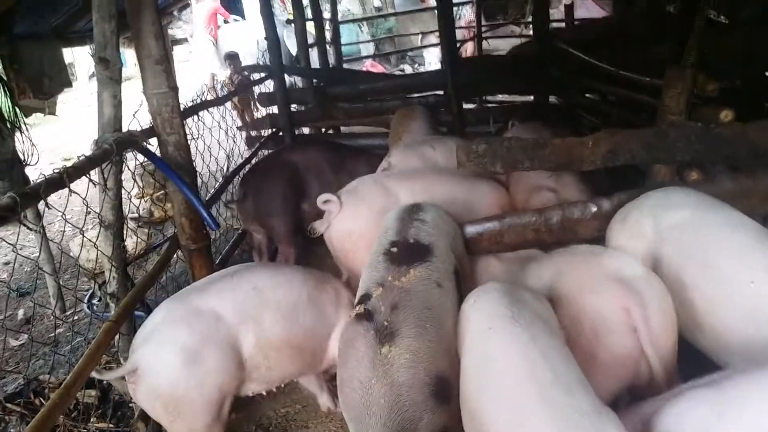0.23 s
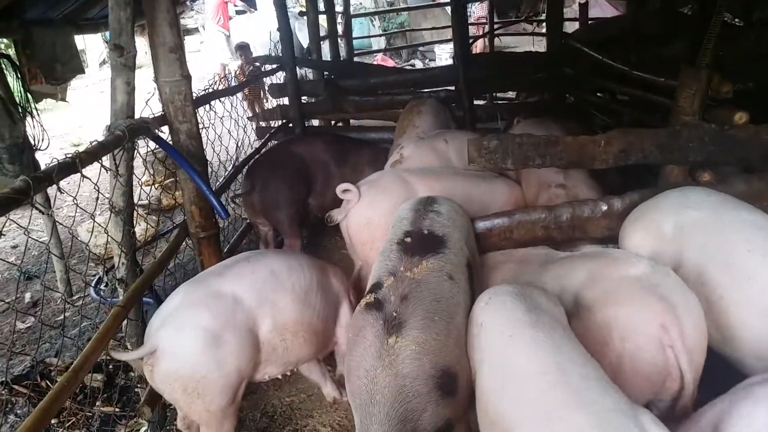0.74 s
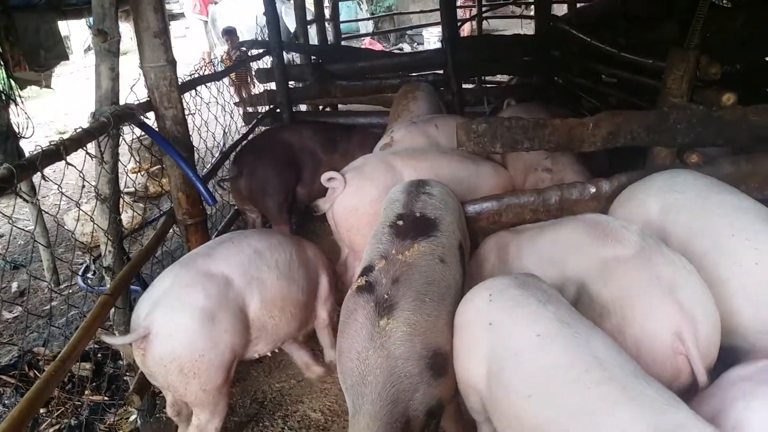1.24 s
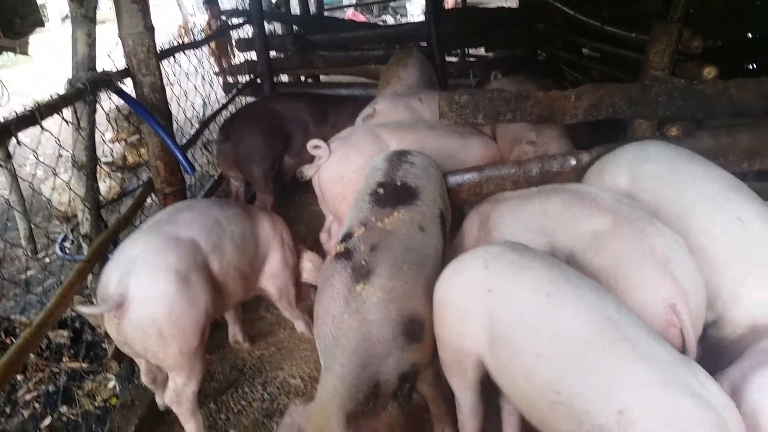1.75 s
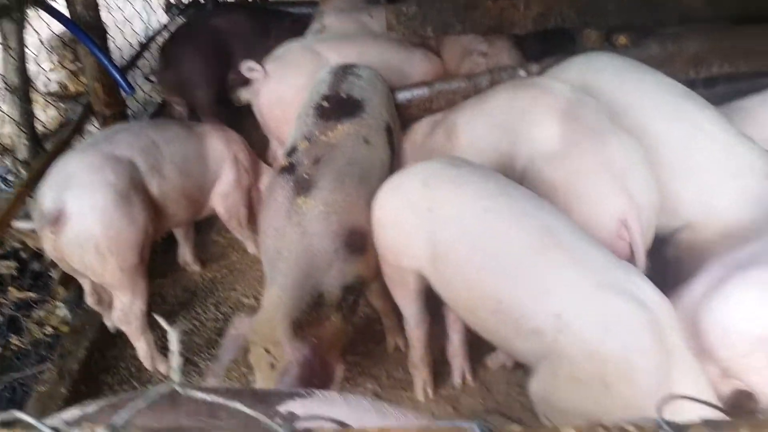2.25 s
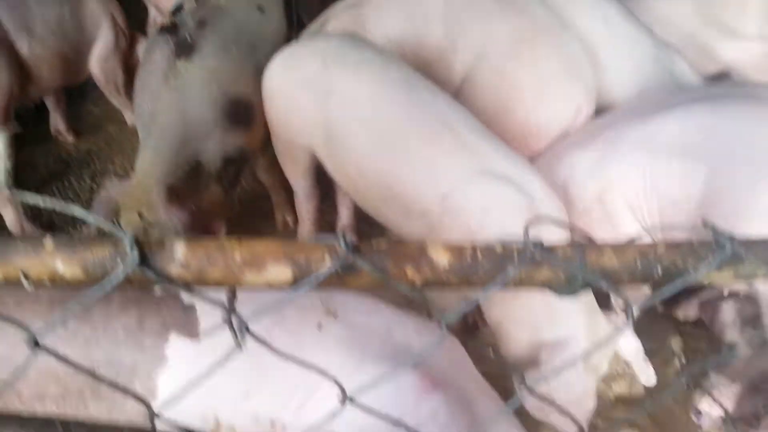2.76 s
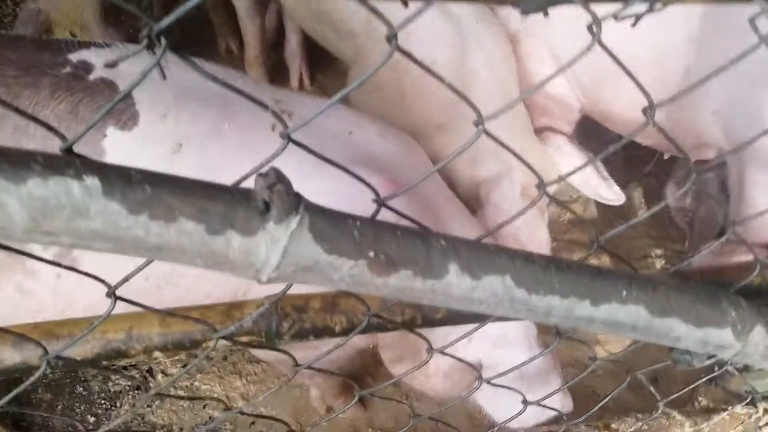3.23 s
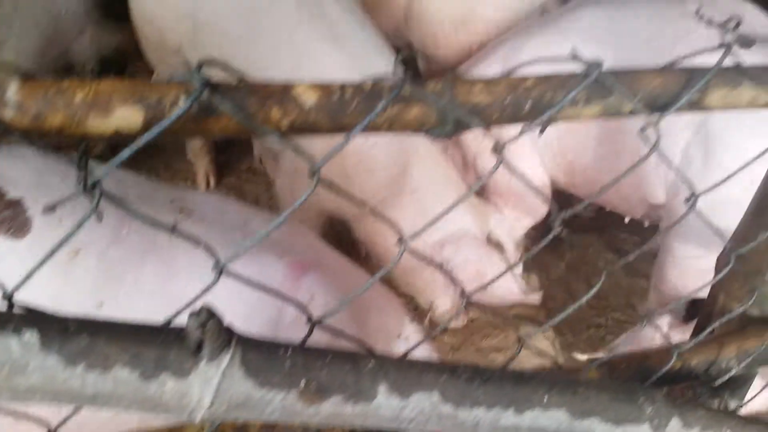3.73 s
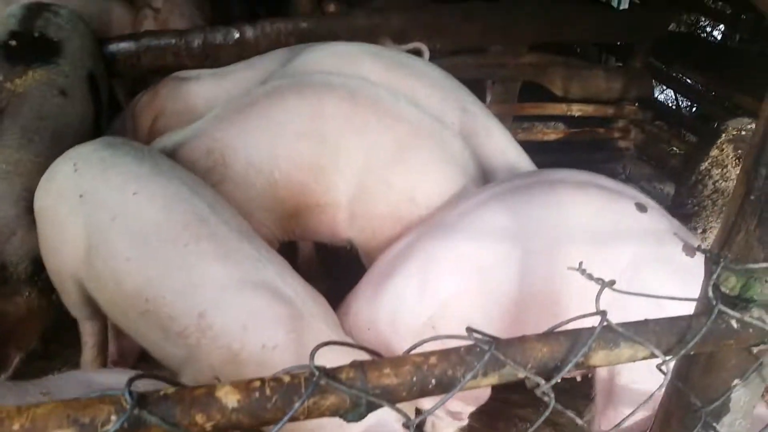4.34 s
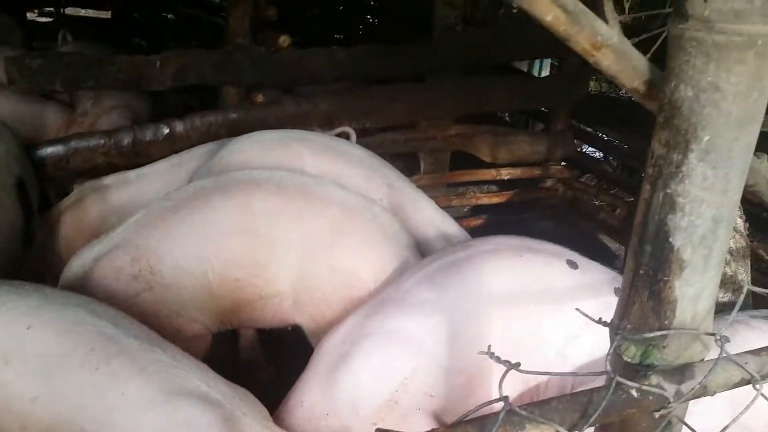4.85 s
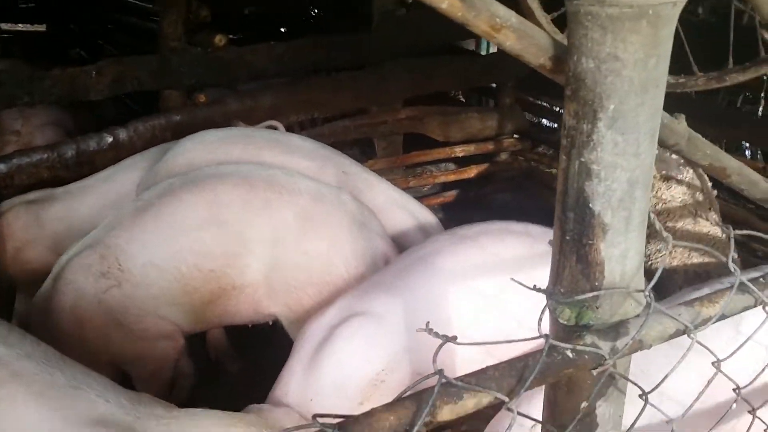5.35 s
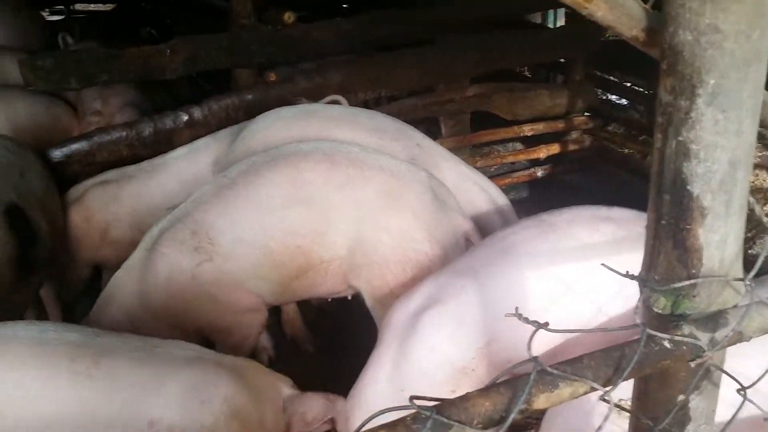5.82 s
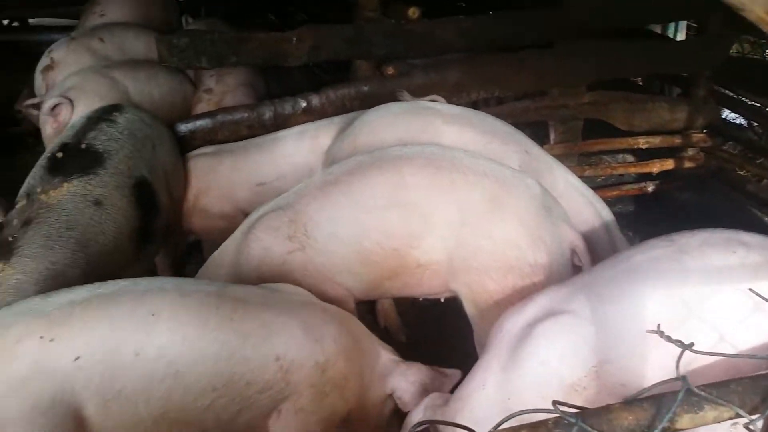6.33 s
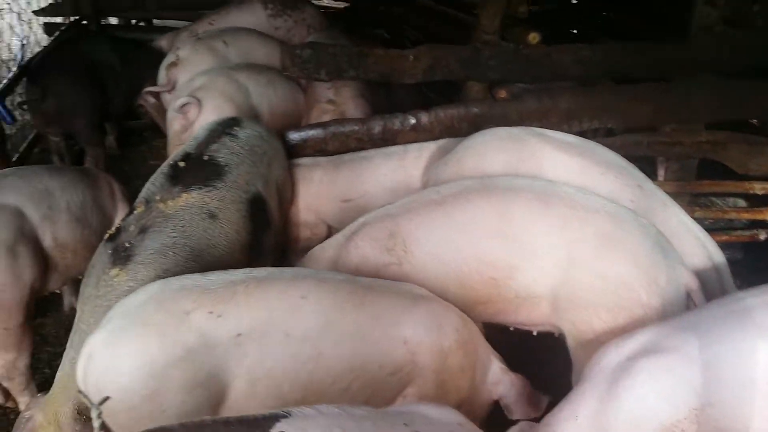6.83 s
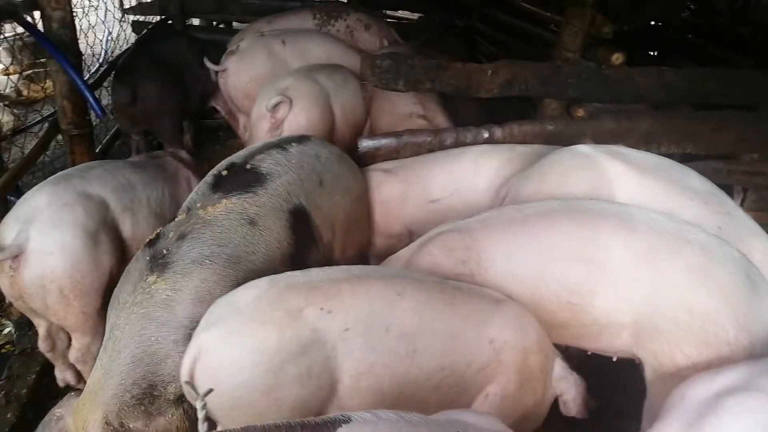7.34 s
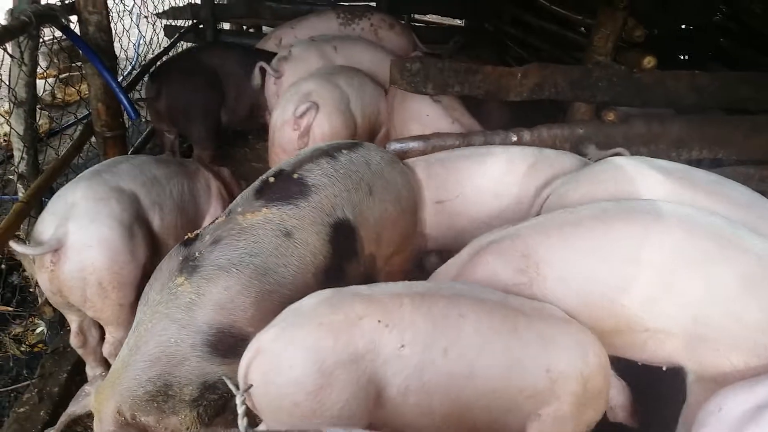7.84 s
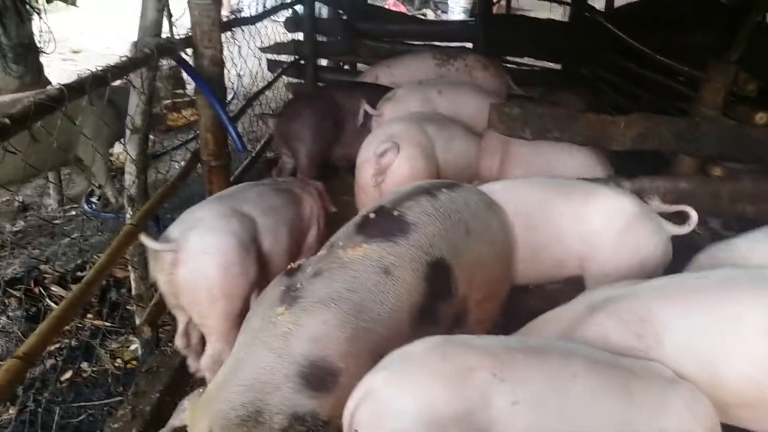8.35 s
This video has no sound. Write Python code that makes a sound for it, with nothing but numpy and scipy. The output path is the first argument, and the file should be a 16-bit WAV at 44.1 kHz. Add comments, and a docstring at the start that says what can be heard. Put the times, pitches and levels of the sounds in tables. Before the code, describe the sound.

A herd of pigs feeds close by in an open wooden pen with a slight, short echo. Low muttering, snuffling and wet smacking, chomping and slurping continue throughout. A blunt oink comes at about 0.5 seconds, short rattling grunts around 1.3 to 1.5 seconds, and another at 2.2. A low rumble and brief growls follow from 2.6 to 3 seconds, then a faint whimper. At 3.4 seconds one pig starts growling and works up into a loud, hoarse scream, which turns shrill with a braying edge and lasts until about 5.4. Sharp growls near 6 seconds lead into a second, shorter scream from 6.2 to 6.9. From about 7.3 seconds, throaty growls and closed-mouth rumbles take over, dying away by 8.3 and leaving the snuffling and wet smacks of feeding.

```python
"""Pigs jostle at a trough in an open wooden pen; throughout, the herd mutters, snuffles and smacks wet feed.
First come an oink and short rattling grunts: slack tissue chops the breath and the vocal tract resonates.
Low rumbles, growls and a faint whimper follow. At 3.4 s one pig works itself up from a growl into a long
hoarse scream, on which taut vocal folds add a shrill squeal and a bray at a seventh of its pitch.
A second, shorter scream rises at 6.2 s; growls and closed-mouth rumbles end the scene."""
import sys
import numpy as np
from scipy import signal
from scipy.fft import rfft, irfft, next_fast_len
from scipy.io import wavfile
from scipy.ndimage import uniform_filter1d, map_coordinates

SR = 44100
rng = np.random.default_rng(int(sys.argv[2]) if len(sys.argv) > 2 else 0)


def wav_out(sig):
    """Save sig, one row per channel (or a flat mono array), as 16-bit PCM at SR to the path in sys.argv[1]."""
    wavfile.write(sys.argv[1], SR, np.round(np.clip(np.atleast_2d(sig).T, -1, 1) * 32767).astype(np.int16))


N = 378378
TIME = np.arange(N) / SR

# spectrum of the pen's echo: (frequency [Hz], gain [dB])
ECHO_SPECTRUM = [(200, -15), (700, 1.5), (1500, 1.5), (4000, 5.5), (10000, 2.5)]
# stereo balance of each source: (frequency [Hz], left minus right [dB])
HERD_BALANCE = [(60, -3), (150, -2.5), (380, -2.5), (950, 1), (2380, 3.5), (5980, 11.5), (15000, 13.5)]
GRUNT_BALANCE = [(250, -3.5), (1200, 3.5), (3000, 0), (8000, 13)]
GROWL_BALANCE = [(60, 5), (240, -4), (950, 3.5), (3770, 5), (15000, 34)]
SCREAM_BALANCE = [(60, -2.5), (130, -2.0), (290, -2.5), (640, -1.5), (1410, 4), (3100, 4), (5000, 4),
                  (7300, 24.5), (10000, 15), (14000, 9)]
# likeness of the herd's sound left and right: (frequency [Hz], correlation [-1 to 1])
HERD_CORRELATION = [(60, 0.84), (150, 0.96), (380, 0.9), (950, 0.4), (2380, -0.0057), (5980, 0.23),
                    (15000, -0.3)]
# spectra of the noise sources: (frequency [Hz], relative level [dB])
MUTTER_SPECTRUM = [(13, -61), (22, -33), (75, -7), (155, -3), (190, 0.5), (210, -5), (243, -1.5),
                   (302, -11), (339, -4.5), (381, -19.5), (516, -10), (588, -13.5), (700, -12.5),
                   (910, -29), (1540, -120)]
SNUFFLE_SPECTRUM = [(350, -16), (600, -10), (697, -7.5), (756, 0.5), (832, 0.5), (902, -1), (1170, 0),
                    (1410, -2), (1880, -1.5), (2440, -3), (3770, -14), (6060, -16), (7240, -6.5),
                    (10000, -24.5), (15500, -28.5)]
CHOMP_SPECTRUM = [(400, -22), (800, 4), (1200, 7.5), (1700, 6), (2400, 10), (3500, -13), (7300, -8),
                  (11000, -34)]
SLURP_SPECTRUM = [(1500, -25), (3000, -12), (4200, 2), (5500, -1), (7200, 2), (9000, -14), (14000, -19)]
BITE_SPECTRUM = [(300, -22), (700, 2), (900, -9), (1400, -12), (2000, 6), (2750, 3), (3600, -6),
                 (7000, -21), (12000, -35)]
HISS_SPECTRUM = [(2600, -43), (3300, -14), (3700, -8), (4250, -5.5), (4800, -6), (5400, -4.5), (6300, -5.5),
                 (6900, -5), (7450, 2.5), (8100, -6.5), (9000, -12), (10000, -20), (11500, -30),
                 (12800, -24), (14200, -24.5), (15200, -42)]
# slow course of the herd's muttering: (time [s], level [dB])
MUTTER_LEVELS = [(0, -36.5), (1.1, -37.5), (2.6, -37), (4, -36.5), (5.7, -36.5), (6.6, -36.5), (7.2, -37.5),
                 (8.5, -37)]
# wet smacks of snouts and chomps of jaws: (time [s], level before filtering [dB])
SMACKS = [(0.0563, -17.5), (0.238, -30), (0.3, -26), (0.427, -31), (0.506, -25), (0.676, -22.5),
          (1.054, -27), (1.317, -22), (1.4845, -25), (1.6, -25), (1.7574, -26), (1.791, -27),
          (1.9494, -23.5), (2.247, -22), (2.28, -26), (2.4029, -25), (3.42, -23), (3.808, -17.5),
          (5.6035, -17.5), (5.7594, -29), (6.098, -16.5), (6.996, -24), (7.118, -27), (7.429, -25),
          (7.819, -22.5), (8.245, -22.5), (8.303, -24), (8.3509, -20.5), (8.389, -26), (8.411, -22)]
CHOMPS = [(.097, -28), (.335, -26.5), (.75, -30), (1.21, -31), (1.665, -30), (1.88, -31), (2.11, -26.5),
          (2.345, -27.5), (2.53, -26), (3.225, -31), (5.605, -36), (5.661, -37), (5.76, -24)]
# snouts sucking at slop, and closed-mouth rumbles: (time [s], duration [s], level [dB])
SLURPS = [(0.063, .035, -43), (0.828, .03, -50), (1.06, .025, -47), (1.33, .04, -46), (1.578, .05, -45),
          (1.657, .04, -49), (2.26, 0.063, -43.5), (2.517, .015, -45), (8.333, .07, -48)]
RUMBLES = [(2.6, 0.37, -46), (4.3, .12, -45), (7.55, 0.31, -39.5), (8.0, 0.33, -42.5)]
# resonances of the airways: (frequency [Hz], half-width [Hz], relative gain [dB])
RUMBLE_CHEST = [(86.3, 16, 1), (114.5, 36, -2)]
OINK_SNOUT = [(510, 76, 1.5), (730, 80, -3.5), (1150, 110, 3), (1420, 83, 3), (1680, 64, -4),
              (2850, 180, -11)]
GRUNT_MOUTH = [(550, 120, 7.5), (1160, 135, 14.5), (1800, 200, -5), (2420, 880, -5), (6960, 420, -4)]
GROWL_CHEST = [(205, 27, -1.6), (250.5, 22, -0.6), (291, 31, -1.3)]
GROWL_MOUTH = [(691, 47, 5.5), (1064, 116, -7), (1287, 120, -1), (1437, 63, -5), (2180, 200, -9),
               (2740, 180, -8), (3450, 230, -18), (6930, 870, -24.5)]
WINDUP_MOUTH = [(669, 39, 3.5), (1322, 133, 1.5), (1455, 42, 7), (2190, 48, -0.5), (2460, 120, -5.5),
                (2890, 96, -8), (3330, 290, -17.5), (7000, 930, -23)]
SCREAM_THROAT = [(679.3, 26, -0.5), (763, 44, -8)]
SCREAM_MOUTH = [(1228, 91, 0), (1372, 23, 3), (1491, 73, 2), (2145, 56, -1.5), (2470, 133, 1.5),
                (2745, 57, 3.5), (3110, 130, -11), (3470, 610, -8.5)]
SCREAM_NOSE = [(1560, 37, -2), (2123, 32, -3), (2558, 83, 6), (2870, 62, -1), (3200, 100, -1.5),
               (6140, 290, -10.5)]
# hard snaps of the throat within the calls: (time [s], relative ring level [dB], relative bite level [dB])
SNAPS = [(0.481, -19.5, -28), (1.284, -17, -34), (1.31, -13, -29), (1.347, -21, -22), (1.365, -16, -34),
         (1.41, -18, -38), (1.44, -18.5, -36), (2.942, -19, -21), (5.956, -19, -19), (6.023, -25, -23),
         (6.046, -15, -14), (6.07, -18, -22), (6.096, -19, -15), (7.455, -16, -14), (7.697, -24, -22),
         (7.748, -33, -20)]
# modes that a snap excites: (frequency [Hz], gain [dB], time to decay by 60 dB [s])
SNAP_MODES = [(276, -8, 0.047), (1090, -4, 0.048), (1217, -6, 0.047), (1390, -12, .03)]
# a blunt oink, open-mouthed growls, and growls that lead into the screams:
# (time [s], duration [s], mouth delay [s], pitch [Hz], relative chest level [dB],
#  relative mouth level [dB])
OINKS = [(0.463, 0.044, 0.003, 284.4, -35, -27.5)]
GROWLS = [(2.857, 0.054, 0, 293.7, -31.5, -35), (2.932, 0.025, 0.0077, 299.6, -26.5, -28),
          (2.969, 0.036, 0.0018, 298, -28.5, -25), (7.322, .015, .015, 250, -32, -50),
          (7.348, 0.085, 0.035, 264, -26, -31.5), (7.45, 0.072, 0.005, 287.7, -29, -33.5),
          (7.545, 0.17, 0.002, 299, -29, -26), (7.735, .13, .002, 269.8, -30.5, -30.5)]
WINDUPS = [(3.406, 0.054, 0.0067, 290, -28.5, -37.5), (3.452, 0.055, 0.009, 288, -26.5, -34),
           (3.505, 0.045, 0.0072, 302.4, -23, -26.5), (3.577, 0.16, 0.00038, 299, -26.5, -30.5),
           (5.872, 0.04, 0.025, 262, -27.5, -33), (5.951, 0.04, 0.002, 267.6, -24.5, -30.5),
           (6.015, 0.085, 0.0008, 278, -26.5, -21), (6.125, 0.095, 0.0002, 273, -27, -24)]
# short grunts, and a throaty swell near 1.2 kHz within the last growl:
# (the six columns above, scale of the mouth's resonances [ratio])
GRUNTS_AND_SWELL = [(1.28, 0.008, 0.0064, 301, -36, -31, 0.92),
                    (1.308, 0.041, 0.0017, 300.7, -31, -24.5, 1.01), (1.385, .03, 0, 298.8, -31, -36, .98),
                    (1.445, .04, 0, 298.2, -25.5, -32.5, .98),
                    (1.519, 0.03, 0.00099, 294, -31.5, -35.5, 0.97), (2.215, 0.094, 0, 290, -27.5, -32, 1),
                    (7.458, 0.068, 0.002, 288, -50, -25.5, 1.05)]
# harmonic spectra of the voiced sounds: (harmonic [number], relative level [dB])
CHEST_HARMONICS = [(1, -1.5), (2, -21), (4, -19), (5, -25), (7, -30), (8, -31)]
FIRST_BRAY_HARMONICS = [(4, -12), (5, -7), (7, -10), (8, -6), (9, -2), (10, -6), (15, -13), (16, -13),
                        (21, -7.5)]
SECOND_BRAY_HARMONICS = [(4, -9), (5, -16), (8, -15), (9, -1), (13, -15), (15, -19), (21, -4), (23, -18)]
SQUEAL_HARMONICS = [(2, 2), (3, -11.5), (4, -24), (5, -19), (6, -13), (7, -29)]
# a chest tone, and a moan on the throat's resonance that rises with effort and sinks as the scream tires;
# one list per scream: (time [s], pitch [Hz], level [dB])
CHEST_NOTES = [
    [(3.7, 301.2, -32), (3.75, 305.4, -23), (3.94, 303.6, -21), (4.0, 314, -28), (4.07, 321, -28.5),
     (4.19, 330.6, -30), (4.43, 336.4, -29), (4.82, 337, -36.5), (5.0, 340, -46.5)],
    [(6.32, 313.4, -47), (6.6, 329.3, -41), (6.76, 336, -29.5), (6.89, 314, -41)],
]
MOAN_NOTES = [
    [(3.69, 690, -37), (3.93, 667, -42), (4.15, 664, -36), (4.19, 666.3, -29.5), (4.4, 682, -33.5),
     (4.8, 684.4, -34), (5.15, 698.3, -35), (5.26, 680, -39), (5.43, 640, -45)],
    [(6.2, 664, -37), (6.31, 665.3, -28), (6.46, 689, -41.5), (6.6, 699, -36), (6.76, 714, -30),
     (6.88, 653, -34)],
]
# vibration of the vocal folds in each scream: (time [s], pitch [Hz])
FIRST_SCREAM_PITCH = [(3.95, 1135), (4.04, 1215), (4.09, 1220), (4.12, 1085), (4.17, 1165), (4.24, 1209),
                      (4.32, 1228), (4.37, 1299), (4.45, 1335), (4.5, 1262), (4.6, 1193), (4.73, 1210),
                      (4.86, 1179), (4.95, 1190), (5.07, 1241), (5.17, 1198), (5.26, 1168), (5.37, 1095),
                      (5.43, 1108)]
SECOND_SCREAM_PITCH = [(6.27, 1165), (6.395, 1145), (6.44, 1211), (6.49, 1221), (6.55, 1172), (6.62, 1243),
                       (6.69, 1225), (6.76, 1175), (6.83, 1084), (6.9, 1048)]
# the squeal catches as a clear whistle: (time [s], duration [s], fundamental [dB], overtones [dB])
WHISTLES = [(4.035, .05, -33, -42), (4.11, 0.045, -35, -29.5), (4.2, .165, -23.5, -26.5),
            (4.382, 0.089, -18.5, -28), (4.491, 0.064, -33.5, -24.5), (4.74, 0.052, -35, -30),
            (5.237, 0.028, -46, -30), (5.395, 0.043, -35, -27), (6.389, 0.076, -23.5, -24),
            (6.59, 0.05, -20.5, -24), (6.81, 0.045, -35, -26.5)]
# a scream starts hoarse; a squeal and a bray join it, in either order; levels are relative:
# (start [s], squeal onset [s], bray onset [s], end [s], throat [dB], mouth [dB], hiss [dB],
#  early hiss [dB], nose [dB], squeal fundamental [dB], overtones [dB], bray [dB], roughness [ratio])
SCREAMS = [(3.674, 4.09, 4.46, 5.43, -27.5, -31.5, -29.5, -39.5, -33, -33.5, -25.5, -33, .55),
           (6.199, 6.371, 6.33, 6.875, -28.5, -26.5, -28, -32.5, -31.5, -28.5, -26, -33, .25)]

GRUNT_ATTACK_S, GRUNT_RELEASE_S, GRUNT_FADE_DB_PER_S = 0.017, 0.049, 23
SCREAM_ATTACK_S, SCREAM_RELEASE_S = 0.036, 0.043
BRAY_CYCLES = 7  # cycles of the squeal in one period of the bray


def amp(db):
    """Amplitude ratio of a level: a factor of ten per 20 dB."""
    return np.exp(np.asarray(db) * (np.log(10) / 20))


def unit(x):
    """Normalisation to an rms of 1."""
    return x / np.sqrt(np.mean(x ** 2) + 1e-20)


def along(points, hz):
    """Interpolation of (frequency [Hz], value) points on a logarithmic axis."""
    frequencies, values = np.transpose(points)
    return np.interp(np.log(hz + 1), np.log(frequencies + 1), values)


def curves(rows):
    """Linear interpolation in time: one value per sample for each column after the first."""
    times, *columns = np.transpose(rows)
    return [np.interp(TIME, times, column) for column in columns]


def ramp(start, length):
    """Linear transition from 0 to 1."""
    return np.clip((TIME - start) / length, 0, 1)


def envelope(start, end, attack, release, fade_db_per_s=0):
    """Amplitude envelope: linear attack and release on an exponential decay."""
    shape, on = np.zeros(N), slice(int(start * SR), int((end + release) * SR))
    age = TIME[on] - start
    rise = np.clip(age / attack, 0, 1)
    fall = np.clip(1 - (TIME[on] - end) / release, 0, 1)
    shape[on] = rise * fall * amp(-fade_db_per_s * age)
    return shape


def wobble(rate):
    """Random modulation: a smooth curve through rate Gaussian knots a second."""
    knots = rng.standard_normal(int(N * rate / SR) + 4)
    coarse = TIME[::8]
    return np.interp(TIME, coarse, map_coordinates(knots, [coarse * rate]))


def filtered(x, response):
    """Linear filtering: the spectrum is multiplied by a frequency response."""
    size = next_fast_len(N + SR // 4, True)
    gain = response(np.fft.rfftfreq(size, 1 / SR)).astype(np.float32)
    return irfft(rfft(x.astype(np.float32), size) * gain, size)[..., :N]


def coloured(x, spectrum):
    """Spectral shaping by (frequency [Hz], gain [dB]) points."""
    return filtered(x, lambda hz: amp(along(spectrum, hz)))


def steadied(x, span_s):
    """Compression: division by the running rms evens out the chance swells of a resonance."""
    return x / np.sqrt(np.abs(uniform_filter1d(x * x, int(span_s * SR))) + np.mean(x * x) / 10)


def panned(pair, balance, colour=np.ones_like):
    """Level difference between the ears: left and right share a signal by frequency."""
    def shares(hz):
        lean = amp(along(balance, hz))
        return 2 * colour(hz) * np.array([lean, np.ones_like(lean)]) / (1 + lean)
    return filtered(pair, shares)


def pen(x, balance, left_lead_s=.0001, t60=0.17, echo_db=0):
    """Diffuse reflection: boards and roof scatter a short echo that shifts as the pigs move."""
    size = SR // 4
    window = np.sin(np.pi * np.arange(size) / size)
    decay = amp(-60 * TIME[:SR // 10] / t60)
    echo = np.zeros((2, N + SR))
    for start in range(0, N, size // 2):
        piece = x[start:start + size]
        tail = rng.standard_normal((2, len(decay))) * decay / np.linalg.norm(decay)
        if np.abs(piece).max() > 1e-5:
            windowed = np.float32([piece * window[:len(piece)]])
            reflected = signal.fftconvolve(windowed, np.float32(tail), axes=1)
            echo[:, start + SR // 300:][:, :reflected.shape[1]] += reflected
    direct = np.array([x, np.interp(TIME - left_lead_s, TIME, x)])
    pair = direct + amp(echo_db) * coloured(echo[:, :N], ECHO_SPECTRUM)
    offset_echo_power = lambda hz: (1 + amp(echo_db + along(ECHO_SPECTRUM, hz)) ** 2 / 2) ** -.5
    return panned(pair, balance, offset_echo_power)


def bursts(rows, t60):
    """Impulsive excitation: exponentially decaying noise for each (time [s], level [dB]) row."""
    out, t = np.zeros(N + SR), TIME[:SR // 10]
    for start, db in rows:
        out[int(start * SR):][:len(t)] += amp(db - 60 * t / t60) * rng.standard_normal(len(t))
    return out[:N]


def flutter(rate, scatter, life, leak, spread_db):
    """Turbulence: each uneven flap of tissue frees a puff of air with a time constant of life cycles."""
    cycles = np.cumsum(rate * np.exp(scatter * wobble(rate))) / SR
    flap = cycles.astype(int)
    strength = amp(spread_db * rng.standard_normal(flap[-1] + 1))[flap]
    puffs = strength * np.exp(-(cycles % 1) / life)
    return unit((puffs + leak) * rng.standard_normal(N))


def tract(x, modes, stretch=1):
    """Formant filtering: resonances with steep skirts, all moved by one factor through time warping."""
    def response(hz):
        return sum(amp(db) * (2j * hz * width / (centre ** 2 - hz ** 2 + 2j * hz * width)) ** 2
                   for centre, width, db in modes)
    clock = np.cumsum(stretch * np.ones(N)) / SR
    warped = np.interp(TIME, clock, x)
    ring = irfft(response(np.fft.rfftfreq(SR // 8, 1 / SR)))
    return np.interp(clock, TIME, signal.oaconvolve(warped, ring)[:N])


def phase_of(pitch, jitter, rate):
    """Phase as the integral of a frequency that trembles at random."""
    return 2 * np.pi * np.cumsum(pitch * (1 + jitter * wobble(rate))) / SR


def partials(phase, harmonics):
    """Fourier series: sines on multiples of a phase, each of rms 1 at 0 dB."""
    angle = (phase % (2 * np.pi)).astype(np.float32)
    return np.sqrt(2) * sum(float(amp(db)) * np.sin(round(k) * angle) for k, db in harmonics)


def hum(pitch, harmonics, jitter, shimmer_db=3.0):
    """Phonation: the folds vibrate almost periodically, with jitter in pitch and shimmer in level."""
    return amp(shimmer_db * wobble(60)) * partials(phase_of(pitch, jitter, rate=140), harmonics)


def crowd(spectrum, patchy_db):
    """Incoherent summation: many snouts merge into partly correlated stereo noise in shifting patches."""
    noise = signal.stft(rng.standard_normal((2, N)), nperseg=512)[2]
    patches = uniform_filter1d(rng.standard_normal(noise.shape[1:]), size=5, axis=0)
    patches = uniform_filter1d(patches, size=14, axis=1)
    pair = signal.istft(noise * amp(patchy_db * unit(patches)), nperseg=512)[1][:, :N]

    def mid_and_side(hz):
        angle = np.arccos(np.clip(along(HERD_CORRELATION, hz), -1, 1)) / 2
        return amp(along(spectrum, hz)) * [np.cos(angle), np.sin(angle)]
    mid, side = filtered(pair, mid_and_side)
    return panned(np.array([mid + side, mid - side]) / np.std(mid), HERD_BALANCE)


def herd(snuffle_db=-39):
    """Amplitude-modulated noise: the herd's low muttering and brighter snuffling waver in level."""
    mutter_db, = curves(MUTTER_LEVELS)
    mutter = amp(mutter_db + 0.52 * wobble(11)) * crowd(MUTTER_SPECTRUM, patchy_db=1.5)
    snuffle = amp(snuffle_db + 0.87 * wobble(14)) * crowd(SNUFFLE_SPECTRUM, patchy_db=2.0)
    return mutter + snuffle


def feeding(chew_count=300):
    """Broadband transients: jaws chew, smack and chomp in wet feed, and snouts suck in rapid puffs."""
    when, strength = rng.random((chew_count, 2)).T
    chews = zip(when * N / SR, -42 + 9 * strength ** 3)
    wet = coloured(bursts(chews, t60=0.014),
                   [(300, -28), (1000, -4), (2300, 13.5), (4500, -1.5), (7300, 13.5), (11000, -11)])
    wet += coloured(bursts(SMACKS, t60=0.024),
                    [(500, -8), (2000, -4), (5000, -8.5), (7400, 5.5), (10500, -15), (15000, -19.5)])
    wet += coloured(bursts(CHOMPS, t60=0.054), CHOMP_SPECTRUM)
    suction = sum(amp(db) * envelope(start, start + length, attack=.01, release=.025)
                  for start, length, db in SLURPS)
    air = flutter(rate=170, scatter=.4, life=0.32, leak=.1, spread_db=5)
    wet += suction * unit(coloured(air, SLURP_SPECTRUM))
    return pen(wet, HERD_BALANCE, t60=0.086, echo_db=-2.5)


def whimper(start=3.22, length=0.012, pitch_hz=750, sag_hz_per_s=190, level_db=-35):
    """Soft phonation: one pig complains briefly on a slightly sagging note."""
    shape = envelope(start, start + length, GRUNT_ATTACK_S, GRUNT_RELEASE_S)
    pitch = pitch_hz - sag_hz_per_s * (TIME - start) * (shape > 0)
    return amp(level_db) * shape * hum(pitch, [(1, 0.5), (2, -8), (3, -6)], jitter=0.039)


def rumbles():
    """Chest resonance under slow puffs of air: contented pigs rumble with their mouths shut."""
    level = sum(amp(db) * envelope(start, start + length, GRUNT_ATTACK_S, GRUNT_RELEASE_S)
                for start, length, db in RUMBLES)
    air = flutter(rate=25, scatter=0.18, life=0.3, leak=.2, spread_db=1.5)
    return panned(level * unit(tract(air, RUMBLE_CHEST)), HERD_BALANCE)


def closure(depth_db, length_s):
    """Occlusion: the throat shuts for an instant before each snap, and the gain dips."""
    shut = sum((TIME > snap - length_s) & (TIME < snap) for snap, *_ in SNAPS)
    return amp(depth_db * uniform_filter1d(shut.astype(float), SR // 500))


def snaps(detune=0.04, rise_s=0.00078):
    """Damped free vibration: the throat bursts open and chest and mouth ring, with a bite of air."""
    rings, t = np.zeros(N + SR), TIME[:SR // 10]
    onset = 1 - np.exp(-t / rise_s)
    for start, ring_db, _ in SNAPS:
        for hz, db, t60 in SNAP_MODES:
            phase = 2 * np.pi * (hz * (1 + detune * rng.normal()) * t + rng.random())
            rings[int(start * SR):][:len(t)] += amp(ring_db + db - 60 * t / t60) * np.sin(phase) * onset
    bites = bursts([(start, db) for start, _, db in SNAPS], t60=0.032)
    return rings[:N] + coloured(bites, BITE_SPECTRUM)


def grunts_and_growls(voiced_share=0.81):
    """Source and filter: slack tissue rattles over a groan; the chest sounds, then the mouth opens."""
    rattle = flutter(rate=38, scatter=.2, life=0.34, leak=0.26, spread_db=2)
    all_calls = [*GRUNTS_AND_SWELL, *OINKS, *GROWLS, *WINDUPS]
    pitch, = curves(sorted((start + length / 2, hz) for start, length, _, hz, *_ in all_calls))
    groan = unit(np.sin(phase_of(pitch, jitter=0.06, rate=130)) * amp(2.8 * wobble(90)))
    chest_noise = unit(steadied(tract(rattle, GROWL_CHEST), span_s=0.039))
    chest = np.sqrt(voiced_share) * groan + np.sqrt(1 - voiced_share) * chest_noise
    opening = closure(depth_db=-6, length_s=0.013)
    shape = lambda start, end: envelope(start, end, GRUNT_ATTACK_S, GRUNT_RELEASE_S, GRUNT_FADE_DB_PER_S)

    def voice(calls, modes, air, chest_trim_db, mouth_trim_db, stretch=1):
        chest_gain, mouth_gain = np.zeros((2, N))
        for start, length, delay, _, chest_db, mouth_db, *_ in calls:
            chest_gain += amp(chest_db + chest_trim_db) * shape(start, start + length)
            mouth_gain += amp(mouth_db + mouth_trim_db) * shape(start + delay, start + length)
        mouth = unit(steadied(tract(air, modes, stretch), span_s=0.036))
        return chest_gain * chest + opening * mouth_gain * mouth

    # a growl leaks more air between flaps
    leaky_rattle = flutter(rate=44, scatter=.2, life=.5, leak=.55, spread_db=0)
    growls = voice(WINDUPS, WINDUP_MOUTH, leaky_rattle, chest_trim_db=-2, mouth_trim_db=0)
    growls += voice(GROWLS, GROWL_MOUTH, leaky_rattle, chest_trim_db=-0.5, mouth_trim_db=0.14)
    gape, = curves([(row[0], row[-1]) for row in GRUNTS_AND_SWELL])
    throaty = voice(GRUNTS_AND_SWELL, GRUNT_MOUTH, rattle,
                    chest_trim_db=-3.5, mouth_trim_db=0.5, stretch=gape)
    throaty += voice(OINKS, OINK_SNOUT, rattle, chest_trim_db=-1, mouth_trim_db=-0.5)
    return (pen(growls, GROWL_BALANCE, t60=0.13, echo_db=-1.5)
            + pen(throaty + snaps(), GRUNT_BALANCE, t60=0.093, echo_db=-4.5))


def held_note(notes, harmonics, jitter):
    """Sustained phonation: a lower, steady vibration sounds along with each scream."""
    pitch, db = curves([*notes[0], *notes[1]])
    gate = sum(envelope(rows[0][0], rows[-1][0], SCREAM_ATTACK_S, SCREAM_RELEASE_S) for rows in notes)
    return gate * amp(db) * hum(pitch, harmonics, jitter, shimmer_db=1.3)


def undertone(pitch, start=5.17, length=0.15, level_db=-34):
    """Partial of a subharmonic: as the first scream tires, the bray's fifth stands out and sinks."""
    swell = envelope(start, start + length, SCREAM_ATTACK_S, SCREAM_RELEASE_S)
    return amp(level_db) * swell * hum(pitch / BRAY_CYCLES, [(5, 0)], jitter=.01)


def chopped(air, pitch, memory):
    """Comb filtering: air let through once a cycle resembles itself, so hiss gathers on the harmonics."""
    return air + sum(memory ** k * np.interp(TIME - k / pitch, TIME, air) for k in (1, 2))


def rasp(pitch, jaw, throat, mouth, nose, hiss, rest_pitch_hz=1159):
    """Forced resonance: chaotic flapping drives throat, mouth and nose and sheds hiss, each at its gain."""
    throat_stretch = 0.99 + 0.08 * jaw  # the resonances rise as the jaw opens
    mouth_stretch = (pitch / rest_pitch_hz) ** 0.45
    air = flutter(rate=200, scatter=.2, life=0.7, leak=0.78, spread_db=4)
    sound = throat * amp(-11) * unit(steadied(tract(air, SCREAM_THROAT, throat_stretch), span_s=0.012))
    sound += mouth * unit(tract(air, SCREAM_MOUTH, mouth_stretch))
    sound += nose * unit(tract(air, SCREAM_NOSE))
    ragged_pitch = pitch * amp(.3 * wobble(45))
    return sound + hiss * unit(coloured(chopped(air, ragged_pitch, memory=.55), HISS_SPECTRUM))


def squeal(pitch, fundamental_gain, overtone_gain, roughness, jitter=.009, shimmer_db=1.4):
    """Self-sustained oscillation: taut folds shriek near 1.2 kHz; a weaker note trembles more."""
    looseness = np.interp(fundamental_gain, amp([-36, -24]), [1.45, .65])
    phase = phase_of(pitch, jitter * looseness, rate=330)
    overtones = partials(phase, SQUEAL_HARMONICS) * (1 + roughness * wobble(420)) / np.hypot(1, roughness)
    tone = fundamental_gain * np.sqrt(2) * np.sin(phase) + overtone_gain * overtones
    return tone * unit(amp(shimmer_db * wobble(170)))


def screams(waver=.004, break_share=0.11, whistle_share=.35):
    """Nonlinear phonation: a chaotic rasp carries a periodic squeal and a subharmonic bray."""
    pitch, = curves([*FIRST_SCREAM_PITCH, *SECOND_SCREAM_PITCH])
    pitch *= 1 + waver * wobble(30)
    throat, mouth, nose, hiss, fundamental, overtones, jaw, roughness = np.zeros((8, N))  # control curves
    bray = np.zeros(N)
    for row, harmonics in zip(SCREAMS, (FIRST_BRAY_HARMONICS, SECOND_BRAY_HARMONICS)):
        start, squeal_on, bray_on, end, throat_db, mouth_db, hiss_db, early_hiss_db, nose_db = row[:9]
        fundamental_db, overtones_db, bray_db, rough_depth = row[9:]
        held = lambda onset, fade=0: envelope(onset, end, SCREAM_ATTACK_S, SCREAM_RELEASE_S, fade)
        broken = ramp(squeal_on, break_share * (end - squeal_on))  # the voice turns shrill
        throat += amp(throat_db) * held(start, fade=5.5)  # fades in dB/s; a negative one swells
        mouth += amp(mouth_db) * held(start, fade=-0.5)
        hiss += amp(early_hiss_db + (hiss_db - early_hiss_db) * broken) * held(start)
        nose += amp(nose_db) * held(start) * (1 - broken)
        fundamental += amp(fundamental_db) * held(squeal_on, fade=15)
        overtones += amp(overtones_db) * broken * held(squeal_on, fade=13)
        roughness += rough_depth * held(start)
        jaw += ramp(squeal_on, end - squeal_on) * held(start)
        braying = envelope(bray_on, end, attack=0.11, release=SCREAM_RELEASE_S)
        bray += amp(bray_db) * braying * hum(pitch / BRAY_CYCLES, harmonics, jitter=.016)
    for start, length, fundamental_db, overtones_db in WHISTLES:
        caught = envelope(start, start + length, attack=0.011, release=0.015)
        mouth *= 1 - whistle_share * caught  # a clear whistle takes air from the mouth's rasp
        fundamental = np.maximum(fundamental, amp(fundamental_db) * caught)
        overtones = np.maximum(overtones, amp(overtones_db) * caught)
    hoarse = rasp(pitch, jaw, throat, mouth, nose, hiss) + bray
    hoarse += held_note(CHEST_NOTES, CHEST_HARMONICS, jitter=0.0111)
    hoarse += held_note(MOAN_NOTES, [(1, 0)], jitter=.011)
    body = pen(hoarse, SCREAM_BALANCE, left_lead_s=.00009)
    cry = squeal(pitch, fundamental, overtones, roughness) + undertone(pitch)
    return body + pen(cry, SCREAM_BALANCE, left_lead_s=0.00012, echo_db=-5.5)


def scene():
    """Superposition: the sound pressures of all the pigs add."""
    return screams() + grunts_and_growls() + rumbles() + whimper() + herd() + feeding()


def record(dry, cutoff_hz=15500):
    """Band limiting: an ideal low-pass filter keeps nothing above the cutoff."""
    return filtered(dry, lambda hz: hz < cutoff_hz)


dry = scene()
out = record(dry)
wav_out(out)
```